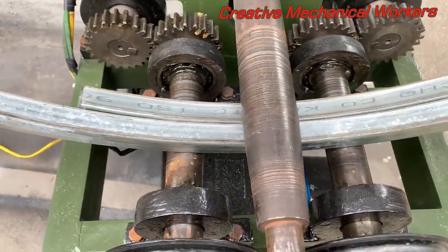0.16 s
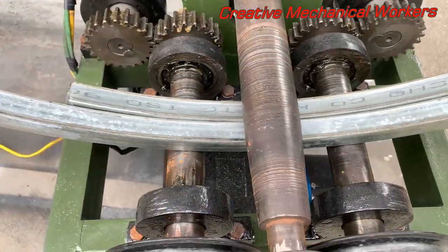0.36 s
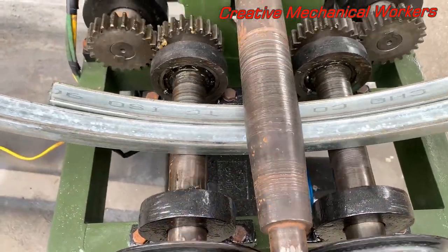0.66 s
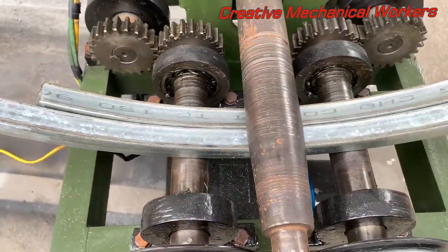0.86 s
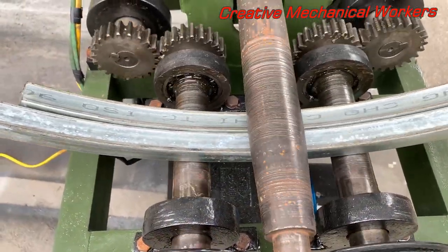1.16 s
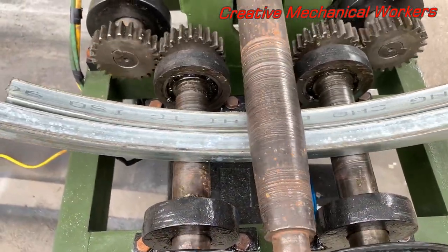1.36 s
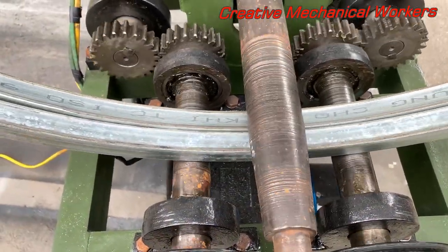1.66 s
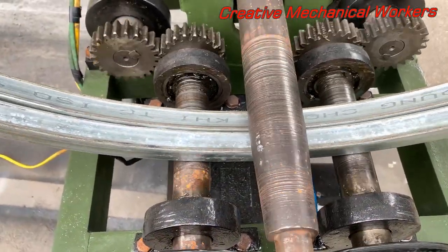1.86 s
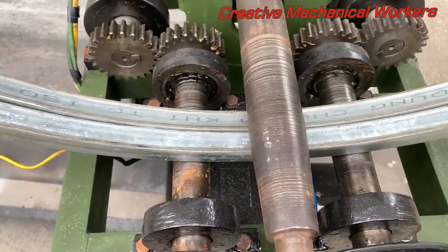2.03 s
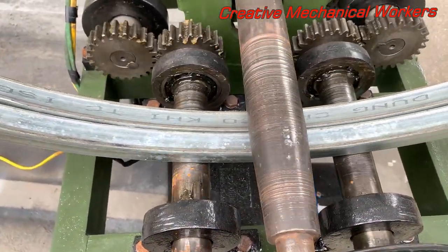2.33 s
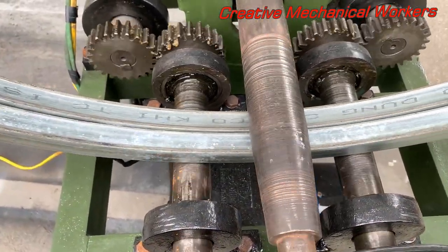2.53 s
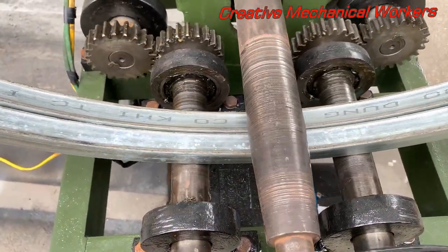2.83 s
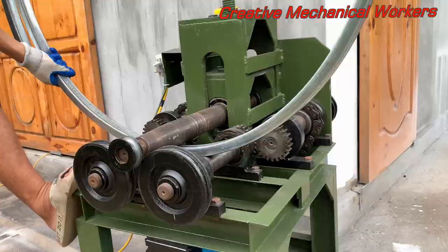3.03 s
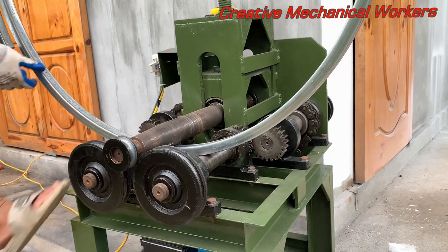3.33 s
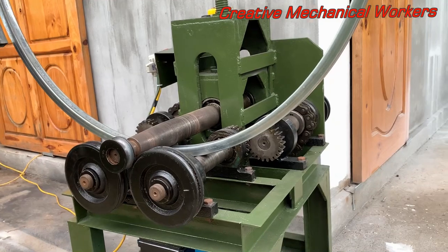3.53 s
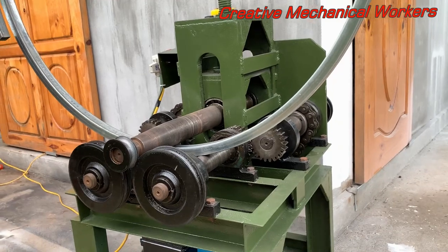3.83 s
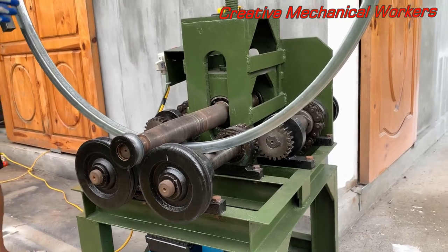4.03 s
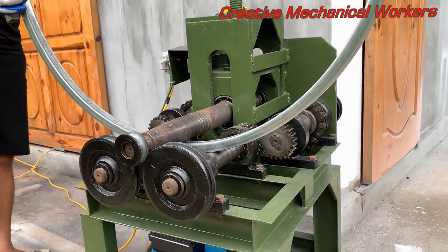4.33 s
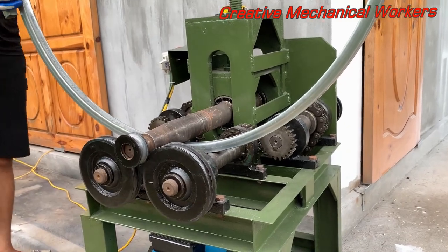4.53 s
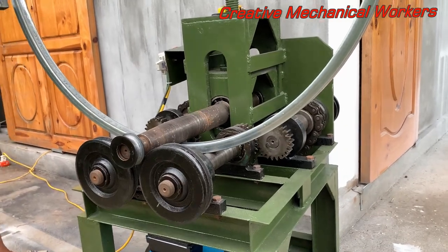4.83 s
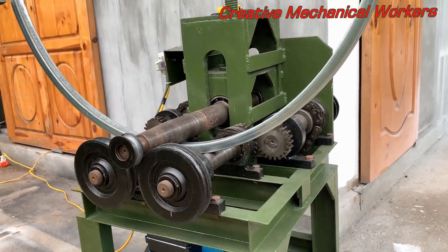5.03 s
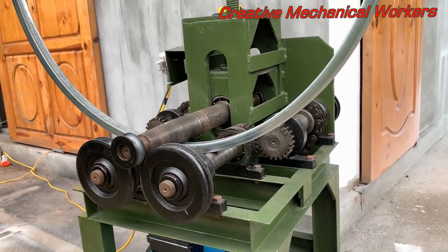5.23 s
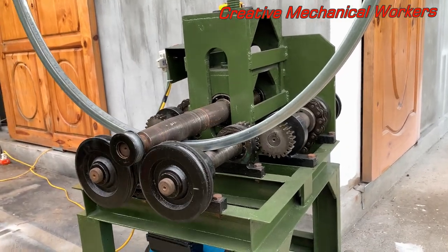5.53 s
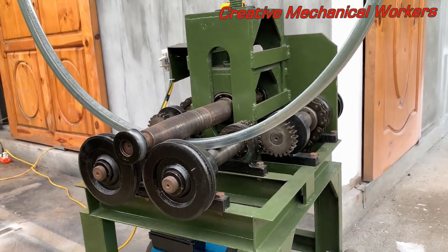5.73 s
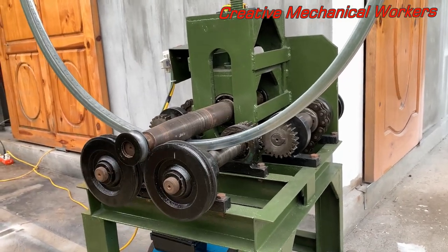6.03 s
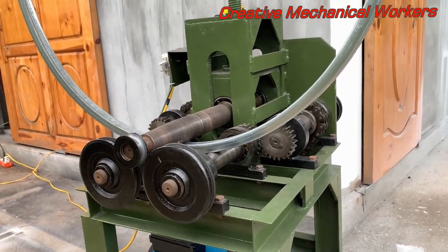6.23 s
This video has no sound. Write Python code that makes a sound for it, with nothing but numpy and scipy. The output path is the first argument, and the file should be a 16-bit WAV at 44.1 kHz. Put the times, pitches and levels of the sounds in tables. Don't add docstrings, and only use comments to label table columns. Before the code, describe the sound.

From 0 s, an electric roller bender runs at full speed, heard outdoors from just above its rollers. A low hum-like gear line and stronger nasal whines hold nearly steady pitch, fluttering about forty-five times a second with a sped-up, choppy roughness. Broad grinding chatter pulses around fourteen times a second, and loose gears growl beneath. Hollow casing knocks are strongest at 0.3-0.45 s, recurring near 0.8, 1.45 and 1.8 s. Small ticks come at 2.6 and 2.95 s, a faint scrape at 3.0 s. At 3.12 s everything drops nearly silent for about 0.02 s, then the same machine resumes a step away, somewhat quieter. A dull frame bump falls at 3.6 s; gritty crackle and ticks cluster at 4.0-4.25 s. The bite swells and sags, with short ringing grinds around 4.6-4.8, 5.65 and 5.95 s, continuing unbroken to the end at 6.4 s.

```python
import sys
import numpy as np
from scipy import signal
from scipy.fft import rfft, irfft, next_fast_len
from scipy.io import wavfile
from scipy.ndimage import uniform_filter1d

SR = 44100
rng = np.random.default_rng(int(sys.argv[2]) if len(sys.argv) > 2 else 0)


def wav_out(sig):
    wavfile.write(sys.argv[1], SR, np.round(np.clip(np.atleast_2d(sig).T, -1, 1) * 32767).astype(np.int16))


def convert_level_to_amplitude(level_db):
    exponent = np.asarray(level_db, float) / 20
    return 10 ** exponent


N = 281799
TIME = np.arange(N) / SR
SPEED, HOP = 2, 985
M = SPEED * N + 16 * HOP
CUT_S, RESUME_S = 3.1164, 3.1388
FAR = (TIME > (CUT_S + RESUME_S) / 2).astype(int)
TURN = 2 * np.pi * np.array((44.8, 44.72))[FAR] * TIME
TOOTH_HZ = 13.9


def unit(x):
    return x / np.sqrt(np.mean(x ** 2, axis=-1, keepdims=True))


def walk(rate, size):
    k = int(SR / rate)
    levels = rng.standard_normal(size // 200)[:size // k + 1]
    steps = np.repeat(levels, k)
    return unit(uniform_filter1d(uniform_filter1d(steps, k), k)[:size])


def shape(x, table):
    n = next_fast_len(x.shape[-1])
    hz, db = np.transpose(table)
    gain = convert_level_to_amplitude(np.interp(np.log(np.arange(n // 2 + 1) * SR / n + 1), np.log(hz), db))
    return irfft(rfft(x, n) * gain, n)[..., :x.shape[-1]]


def colour(x, table):
    return unit(shape(x, table))


def ring(x, modes):
    n = next_fast_len(x.shape[-1])
    f = np.arange(n // 2 + 1) * SR / n + 1e-9
    gain = 0
    for k, (hz, width, db) in enumerate(modes):
        level = (-1) ** k * convert_level_to_amplitude(db) * np.sqrt(SR / np.pi / width)
        gain = gain + level / (1 + 2j / 3 * (f - hz ** 2 / f) / width) ** 2
    return irfft(rfft(x, n) * gain, n)[..., :x.shape[-1]]


def rung(knocks, modes):
    return sum(ring(knocks, [(m[0], m[1], m[2 + view]) for m in modes]) * (FAR == view) for view in range(2))


def pair(x, other, share):
    return np.sqrt(1 - share) * x + np.sqrt(share) * other * np.array([[1], [-1]])


def whine(hz, wander_hz):
    phase = 2 * np.pi * np.cumsum(hz + wander_hz * walk(30, size=M)) / SR
    return unit(convert_level_to_amplitude(0.47 * walk(20, size=M)) * np.sin(phase))


def chatter(scatter_db):
    impacts = rng.standard_normal(M)
    size = np.clip(uniform_filter1d(rng.standard_normal(M), size=64) * 8.6, -3, 3)
    return unit(impacts * convert_level_to_amplitude(scatter_db * size))


def splice_points(guide):
    starts = [2 * HOP]
    shifts = 32 * np.arange(-7, 8)
    for k in range(1, N // HOP + 5):
        wanted = guide[starts[-1] + HOP:starts[-1] + 2 * HOP]
        options = 2 * HOP + SPEED * HOP * k + shifts
        starts.append(options[np.argmax([guide[o:o + HOP] @ wanted for o in options])])
    return np.array(starts)


def channel_starts():
    band = [(700, 900, 0)]
    guide = whine(396, 1) + .9 * whine(932, 1) + .5 * whine(1369, 1) + .35 * whine(1331, 1)
    guide += 3 * ring(rng.standard_normal(M), band)
    return [splice_points(guide + 3.5 * ring(rng.standard_normal(M), band)) for _ in range(2)]


def splice(x, starts, turn, dip=1):
    share = .4
    pieces = turn / (2 * np.pi) + .5 + share / 2
    k = pieces.astype(int)
    i = (pieces % 1 * HOP).astype(int)
    fade = np.pi / 2 * np.clip(i / (share * HOP), 0, 1)
    out, into = np.abs(np.cos(fade)) ** dip, np.sin(fade) ** dip
    return np.array([c[s[k] + HOP + i] * out + c[s[k + 1] + i] * into for c, s in zip(x, starts)])


def bite():
    # start_s, level_db
    swell = [(0, -1.5), (.3, 1.5), (1.1, -0.5), (1.9, 1), (2.6, -2), (3.1, 1), (3.3, -3.5), (3.6, 0),
             (3.85, -5), (4.1, 0), (4.3, -4.5), (4.6, 1), (5.0, -1), (5.35, -3), (5.65, 0), (5.85, 0),
             (6.0, -2.5), (6.2, -5)]
    beat = np.array((1.5, 1))[FAR] * np.cos(np.pi * TOOTH_HZ * (TIME - 0.035))
    return np.interp(TIME, *np.transpose(swell)) + beat


def rumble(starts):
    # frequency_hz, level_db per Hz
    near = [(15, -28), (30, -17), (90, -6), (200, -5), (500, -2.5), (1000, -8), (1500, -4.5), (2100, -12.5),
            (4500, -18.5), (6000, -23), (10000, -28.5), (14500, -31), (15700, -37)]
    # frequency_hz, level_db per Hz
    far = [(15, -26), (30, -19), (90, -3.5), (200, -3), (600, -4), (1200, -10), (1600, -5.5), (2300, -11),
           (4500, -16), (6000, -22), (10000, -28.5), (14500, -30), (15700, -38)]
    hiss = splice(pair(chatter(1.83), chatter(3.4), 0.26), starts, TURN)
    tooth = 1 + .55 * np.exp(-((TIME - .0086) * TOOTH_HZ % 1) / .15)
    hiss = hiss * tooth * convert_level_to_amplitude(0.17 * walk(17, size=N))
    return sum(convert_level_to_amplitude(db) * colour(hiss, table) * (FAR == view)
               for view, (table, db) in enumerate(((near, -36.5), (far, -39))))


def scrapes():
    # start_s (centre), length_s, level_db
    drags = [(1.66, .03, -50), (3.019, 0.04, -43), (4.017, .04, -45.5), (4.065, 0.03, -40),
             (4.092, 0.053, -37), (4.134, 0.035, -53), (5.205, 0.064, -49), (6.27, .03, -57)]
    # frequency_hz, level_db per Hz
    spectrum = [(800, -16), (2000, 13.5), (3600, -0.5), (6000, 1), (8700, 5.5), (11000, -2), (14000, 1),
                (16000, -1)]
    crackle = rng.standard_normal((2, N)) * convert_level_to_amplitude(2.7 * walk(200, size=N))
    swell = sum(convert_level_to_amplitude(db) * np.exp(-(2 * (TIME - s) / length) ** 2) for s, length, db in drags)
    return colour(crackle, spectrum) * swell


def ticks():
    # start_s, level_db (peak), centre_hz, pan_db (left minus right)
    events = [(2.637, -41, 4100, 0), (2.9572, -39, 4720, 0), (4.058, -40, 13500, 0), (4.066, -51, 3700, 0),
              (4.07, -41, 14500, 0), (4.084, -40, 8700, 0), (4.088, -42, 13000, 0), (4.106, -42, 8900, -5),
              (4.18, -41, 5600, 0), (4.218, -40, 4260, 0), (4.2484, -37, 4230, 0), (4.5124, -48, 4310, 0),
              (5.615, -40, 4410, 8), (5.7588, -40, 4440, 8)]
    out = np.zeros((2, N))
    decay = np.exp(-TIME[:600] / 0.0029)
    for s, db, hz, pan_db in events:
        tick = ring(rng.standard_normal((2, 600)) * decay, [(hz, 0.12 * hz, 0)])
        level = convert_level_to_amplitude(db + 4.5 + np.array([[pan_db], [-pan_db]]) / 2)
        start = int(s * SR)
        out[:, start:start + 600] += level * tick / np.abs(tick).max()
    return out


def damped_rings(events, more_db, decay_s):
    out, t = np.zeros(N + 4096), TIME[:4096]
    envelope = (1 - np.exp(-t / .0007)) * np.exp(-t / decay_s)
    for s, db, hz in events:
        start = int(s * SR)
        out[start:start + 4096] += convert_level_to_amplitude(db + more_db) * np.sin(2 * np.pi * hz * t * (0.95 + 3 * t)) * envelope
    return out[:N]


def frame_bumps():
    # start_s, level_db (peak), pitch_hz
    knocks = [
        (3.61, -34, 227),
    ]
    return damped_rings(knocks, 0, 0.015)


def brief_rings():
    # start_s, level_db (peak), pitch_hz
    ring_events = [(0.06, -40, 950), (0.189, -23, 950), (0.282, -13, 910), (0.328, -13.5, 939),
                   (0.371, -10.5, 914), (0.439, -13, 926), (0.576, -31, 935), (0.613, -24, 900),
                   (0.655, -18, 910), (0.795, -11, 935), (0.84, -18, 917), (1.085, -22, 1010),
                   (1.153, -17, 900), (1.444, -14, 933), (1.527, -16, 940), (1.777, -12.5, 910),
                   (1.865, -27, 940), (1.912, -25, 900), (2.133, -37, 920), (2.205, -24, 960),
                   (2.264, -19, 925), (2.845, -16, 940), (2.894, -19, 855), (3.028, -20, 970),
                   (3.612, -21, 930), (3.729, -20, 1010), (3.938, -28, 1270), (4.084, -23, 964),
                   (4.338, -19, 1090), (4.386, -29, 915), (4.446, -23, 945), (4.587, -23, 1310),
                   (4.618, -20, 924), (5.005, -18, 1050), (5.113, -23, 960), (5.227, -19, 940),
                   (5.266, -23, 1045), (5.321, -22, 960), (5.539, -22, 970), (5.828, -22, 980),
                   (5.951, -31, 950), (6.122, -25, 950), (6.343, -19.5, 935)]
    return damped_rings(ring_events, -7.5, 0.01)


def flares(knocks):
    # start_s (centre), length_s, level_db, pitch_hz
    events = [(3.42, .04, -50, 2900), (3.68, .03, -50, 2820), (3.98, 0.065, -57, 2930),
              (4.21, 0.064, -50, 2900), (4.035, .02, -49, 4000), (4.077, .05, -43, 3590),
              (4.08, 0.063, -41, 2010), (4.35, .05, -40, 1074), (4.474, 0.081, -41, 1750),
              (4.603, .07, -34, 1000), (4.754, .03, -34, 1310), (4.785, 0.055, -41, 1730),
              (4.804, 0.036, -40, 1020), (5.654, 0.092, -30, 1047), (5.675, .03, -43, 2850),
              (5.787, 0.022, -46, 2820), (5.804, 0.12, -45, 1740), (5.949, 0.041, -32.5, 1702),
              (5.963, .04, -32.5, 997), (6.145, 0.07, -42, 1720)]
    out = np.zeros((2, N))
    for s, length, db, hz in events:
        part = slice(int(s * SR) - 6000, int(s * SR) + 6000)
        swell = np.exp(-(2 * (TIME[part] - s) / length) ** 2)
        out[:, part] += ring(knocks[:, part] * swell, [(hz, .045 * hz, db)])
    return out


def frame(knocks, bite_db):
    # pitch_hz, width_hz, near_db, far_db
    steel = [(190.5, 63, -41, -43), (317, 42, -44.5, -54), (668, 250, -38, -69), (1037, 106, -48.5, -39.5),
             (2110, 54, -66, -55), (2660, 330, -50, -65), (2825, 110, -81, -52.5), (3860, 110, -60, -57.5),
             (4230, 68, -68, -62), (4310, 130, -61.5, -60), (8770, 1200, -64, -61)]
    out = rung(knocks, steel[:4]) * convert_level_to_amplitude(0.5 * bite_db)
    for modes in (steel[4::2], steel[5::2]):
        out += rung(knocks, modes) * convert_level_to_amplitude(2 * walk(8.1, size=N))
    return out


def growl(starts):
    # pitch_hz, wander_hz, near_db, far_db
    tones = [
        (589.6, 60, -47.5, -58.5),
        (731, 70, -44.5, -65),
        (1099, 60, -54, -49),
    ]
    out = np.zeros((2, N))
    for hz, wander_hz, near_db, far_db in tones:
        tone = whine(hz, wander_hz) * convert_level_to_amplitude(4 * walk(40, size=M))
        out += splice([tone, tone], starts, TURN) * convert_level_to_amplitude(np.where(FAR, far_db, near_db))
    return out


def gearbox(knocks, starts, bite_db):
    # pitch_hz, wander_hz, near_db, far_db
    mesh_lines = [
        [(396, 1.5, -.5, -1.5)],
        [(932, 1.5, 0, 0), (974, 3, -8, -10), (845, 4, -9, -30)],
        [(1331, 1, -8, -10), (1369, 1, -7, -9), (1424, 1, -13, -20)],
        [(1733, 3, -5, -6), (1785, 9, -9, -8)],
    ]
    # pitch_hz, width_hz, near_db, far_db
    casing_modes = [
        [(401.5, 70, -44, -45)],
        [(807, 140, -41.5, -66), (966, 77, -44, -46)],
        [(1334, 140, -39.5, -40)],
        [(1775, 90, -44.5, -46)],
    ]
    throbs = [(.36, .17, -.3, -.35), (.5, .34, 1.6, .95), (.04, .13, -2.3, -1.6), (.02, .06, 0, 1.6)]
    # near_db, far_db, load_share [ratio]
    group_levels = [(-31, -34, 0.43), (-33, -38, -0.0058), (-39, -41, 0.49), (-37.5, -41.5, -0.47)]
    # start_s, level_db above the mean
    load = [(0, -0.5), (.39, 6.5), (.75, -0.3), (1.56, 4.5), (1.95, -5.5), (2.73, 1), (3.12, -13),
            (3.14, -1.5), (3.9, 0.5), (4.4, 1.5), (5.4, -0.5), (6.0, -1.5), (6.39, -1)]
    load_db = np.interp(TIME, *np.transpose(load))
    bite_shares = (0, 0.83, 0.14, 0.22)
    out = np.zeros((2, N))
    for lines, modes, throb, levels, bite_share in zip(mesh_lines, casing_modes, np.array(throbs),
                                                       group_levels, bite_shares):
        group_near_db, group_far_db, load_share = levels
        group_db = np.where(FAR, group_far_db, group_near_db) + load_share * load_db + bite_share * bite_db
        depth, phase = throb[FAR], throb[2 + FAR]
        out += rung(knocks, modes) * (1 + depth * np.cos(TURN + phase))
        for hz, wander_hz, near_db, far_db in lines:
            tone = whine(hz, wander_hz)
            lead = 0.0097 * (hz - lines[0][0])
            swell = 1 + depth * np.cos(TURN + phase - lead)
            level = convert_level_to_amplitude(group_db + np.where(FAR, far_db, near_db))
            out += splice([tone, tone], starts, TURN + phase, dip=2.1) * swell * level
    return out


def viewpoint(mix):
    # frequency_hz, level_db
    near = [(200, -2), (400, 0), (650, -2), (900, 0.7), (1350, 1.5), (1800, 0), (4000, .5), (8000, -.5)]
    # frequency_hz, level_db
    far = [(200, -0.62), (400, -2.6), (650, 2.5), (930, 1.2), (1150, -.6), (2800, -0.88), (4000, 1.4),
           (8000, -1.8), (13000, -0.29)]
    out = np.zeros((2, N))
    for view, table in enumerate((near, far)):
        sides = [shape(c, np.multiply(table, (1, sign / 2))) for c, sign in zip(mix, (1, -1))]
        out += np.array(sides) * (FAR == view)
    drift_db_per_s = np.array((-0.12, -0.18))[FAR]
    pan_db = np.array((0.5, 0))[FAR] + drift_db_per_s * (TIME - FAR * RESUME_S)
    return out * convert_level_to_amplitude(np.array([pan_db, -pan_db]) / 2)


def scene():
    starts = channel_starts()
    knocks = splice(pair(chatter(2.0), chatter(2.0), .25), starts, TURN) * convert_level_to_amplitude(1.1 * walk(30, size=N))
    bite_db = bite()
    mix = rumble(starts) + scrapes() + ticks() + frame_bumps() + brief_rings() + flares(knocks)
    mix += frame(knocks, bite_db) + growl(starts) + gearbox(knocks, starts, bite_db)
    return viewpoint(mix)


def band_limit(x):
    return signal.sosfilt(signal.butter(12, 15820, fs=SR, output="sos"), x)


def record(dry):
    before = np.clip((CUT_S - TIME) / .0015, 0, 1)
    after = np.clip((TIME - RESUME_S) / 0.0023, 0, 1)
    return band_limit(dry * np.maximum(before + after, convert_level_to_amplitude(-50)))


dry = scene()
out = record(dry)
wav_out(out)
```